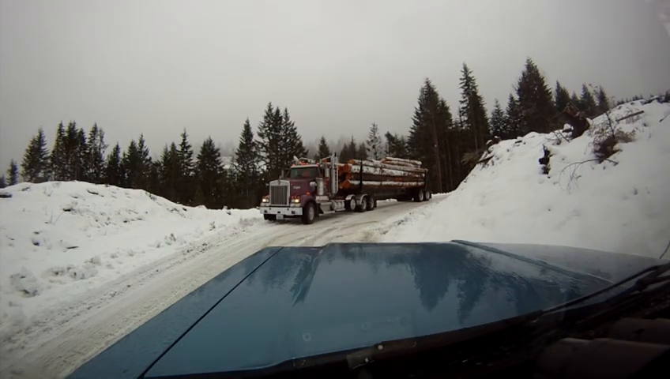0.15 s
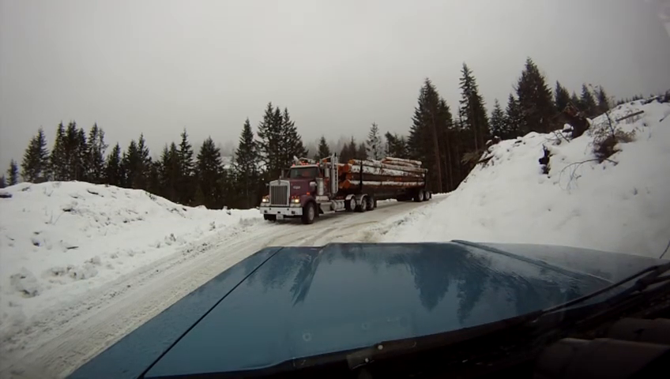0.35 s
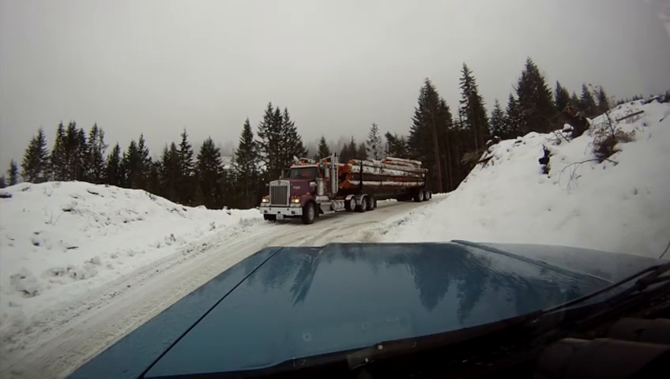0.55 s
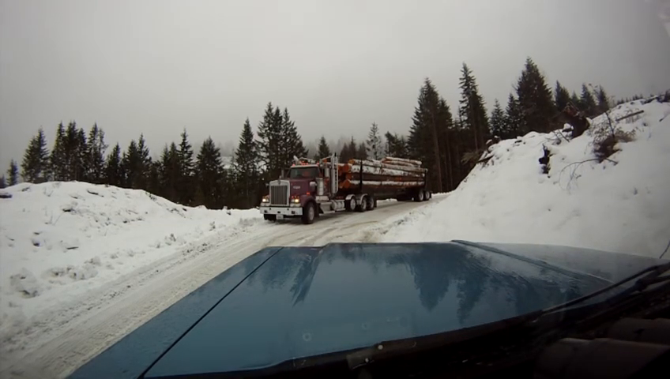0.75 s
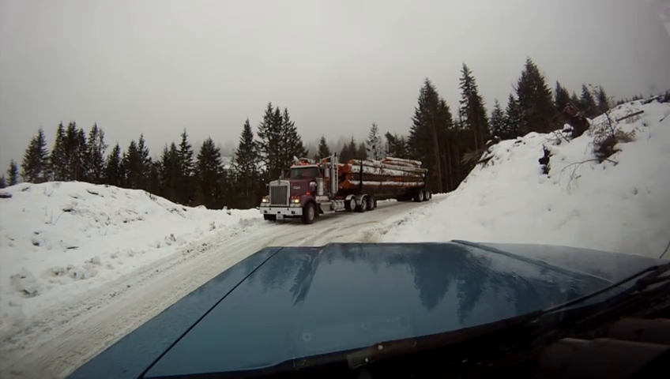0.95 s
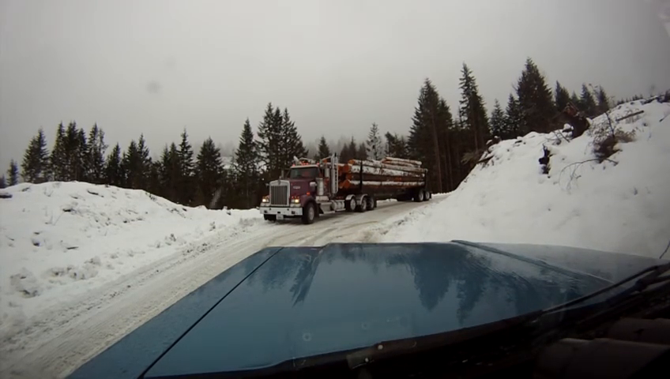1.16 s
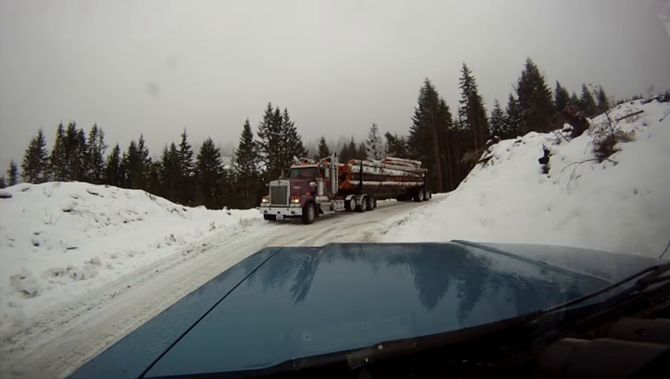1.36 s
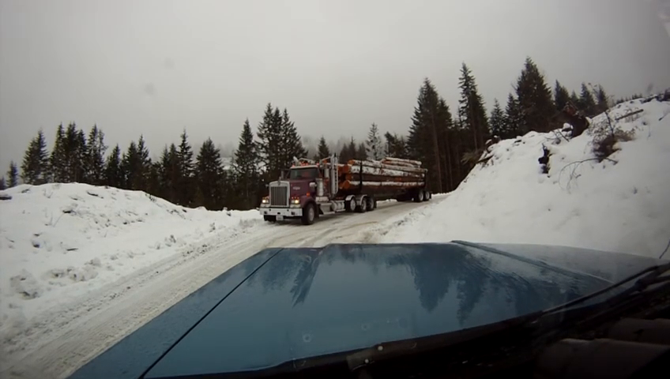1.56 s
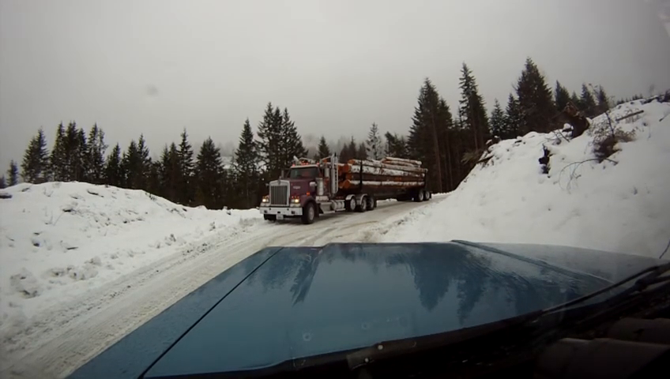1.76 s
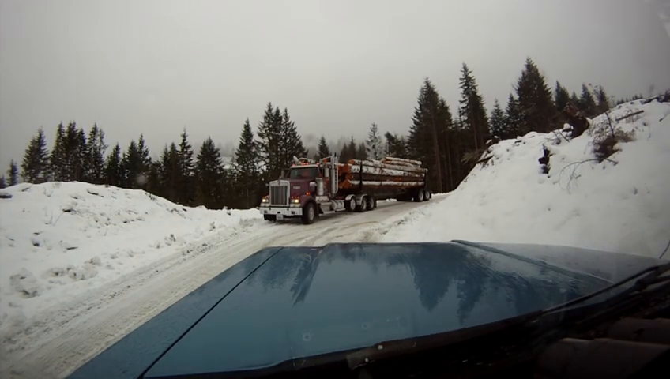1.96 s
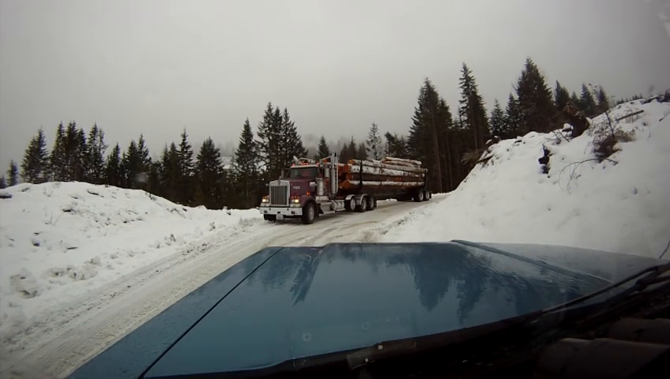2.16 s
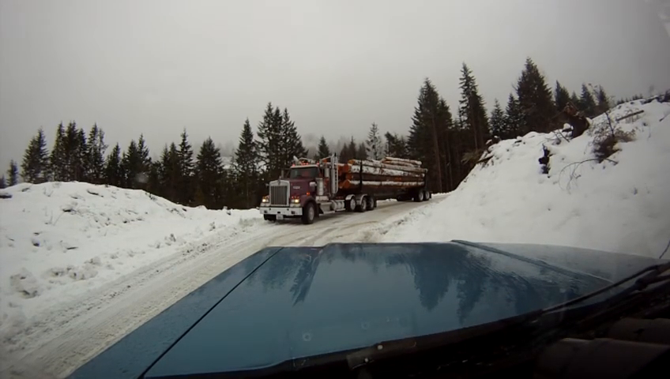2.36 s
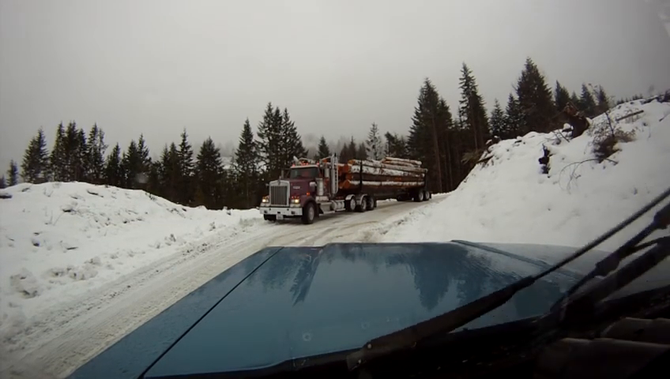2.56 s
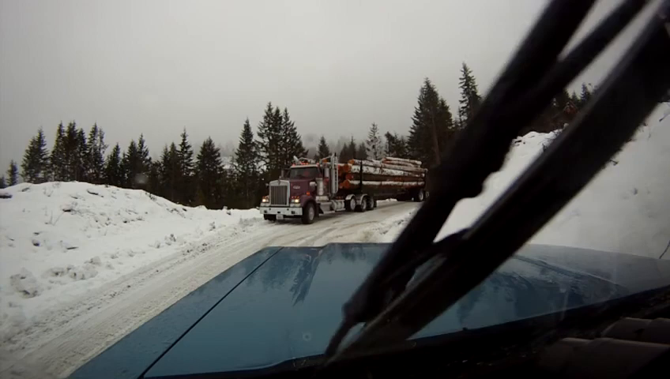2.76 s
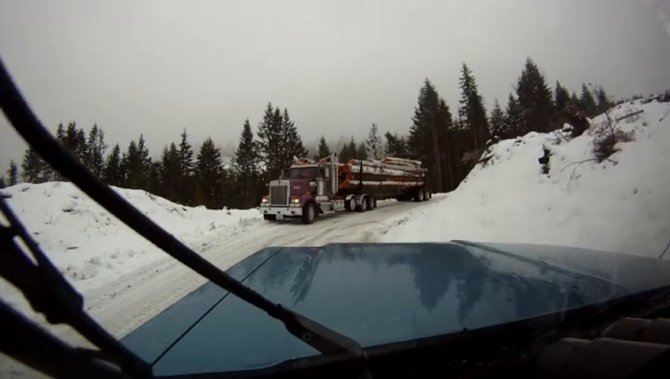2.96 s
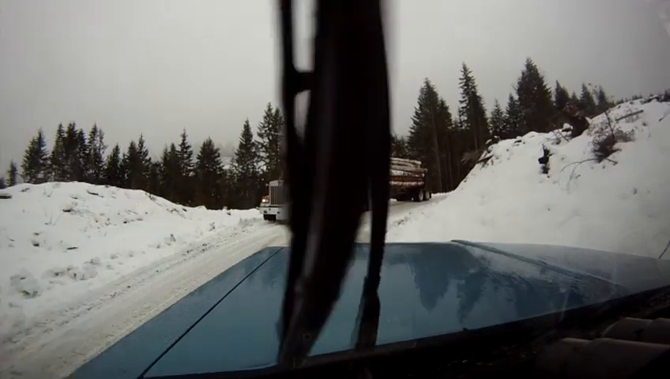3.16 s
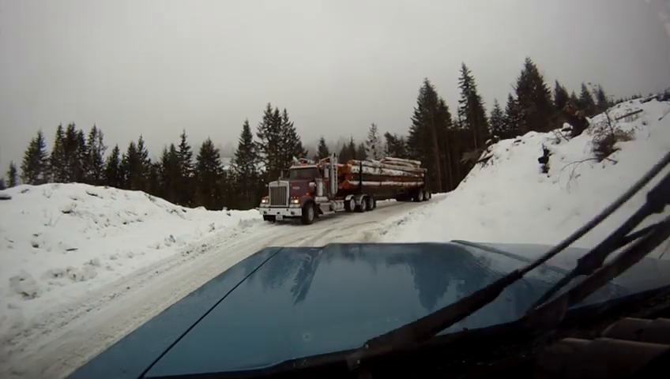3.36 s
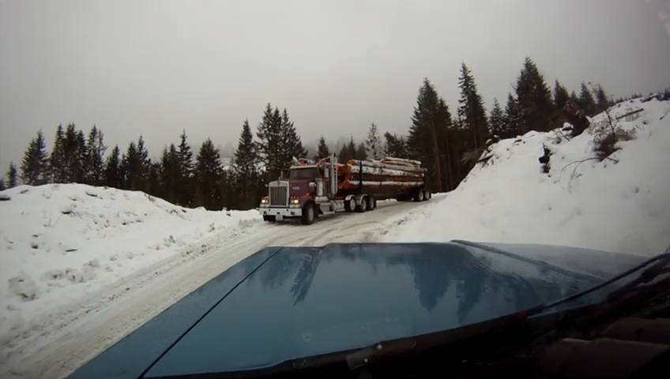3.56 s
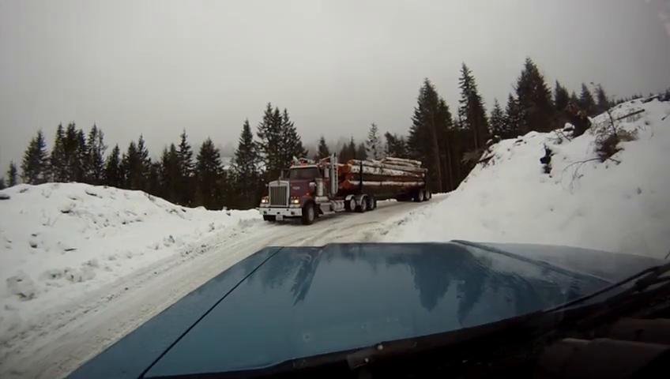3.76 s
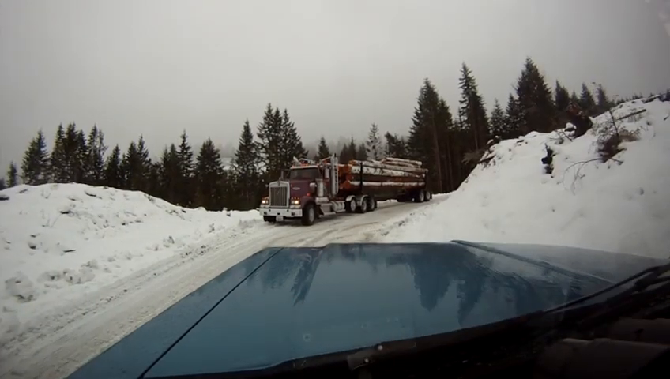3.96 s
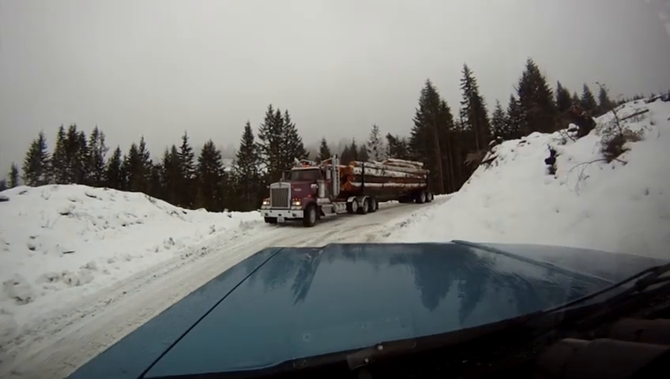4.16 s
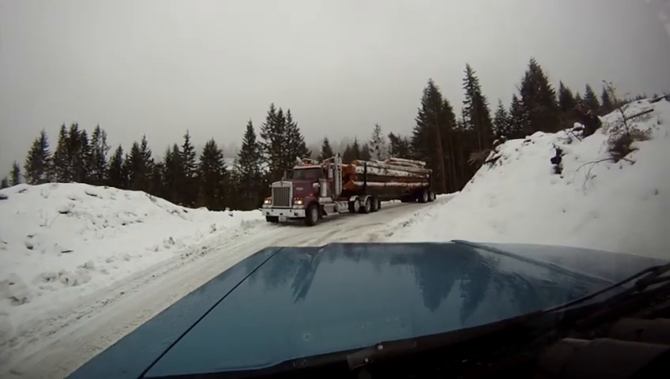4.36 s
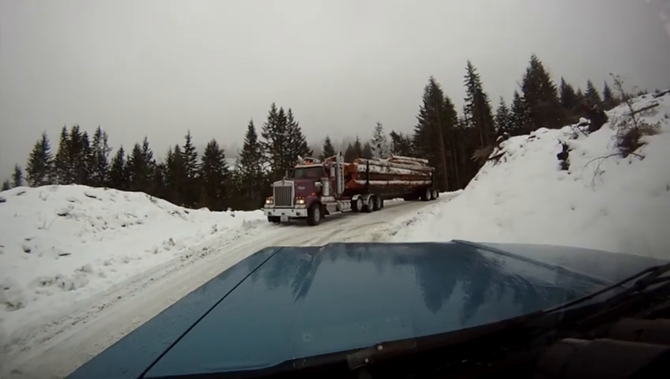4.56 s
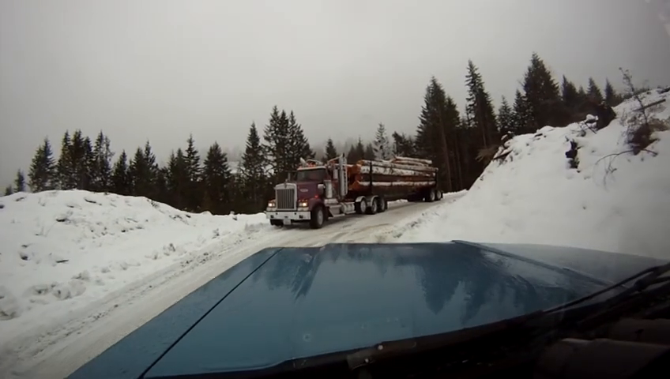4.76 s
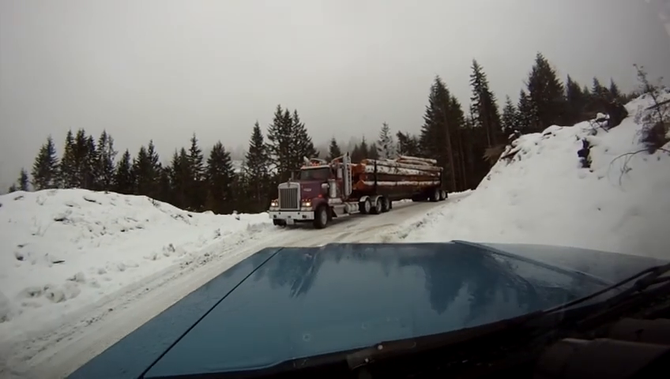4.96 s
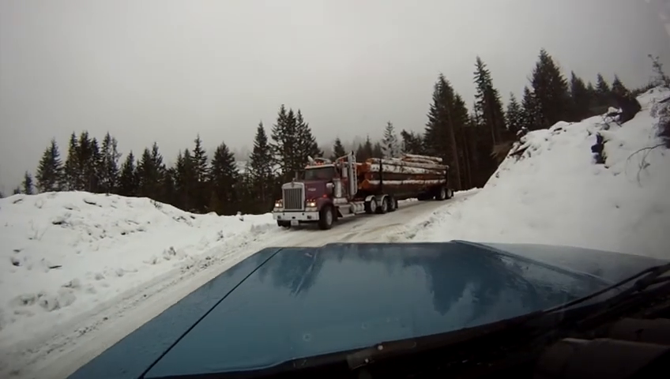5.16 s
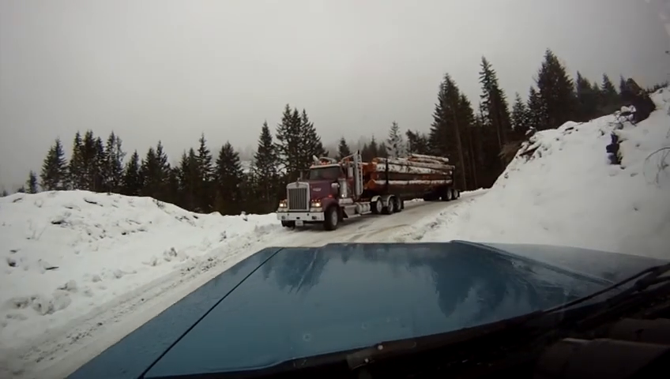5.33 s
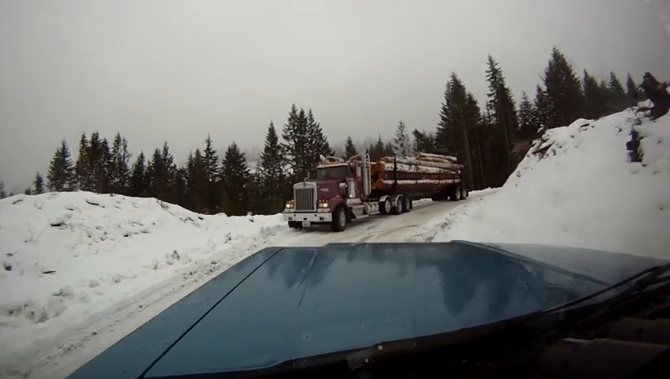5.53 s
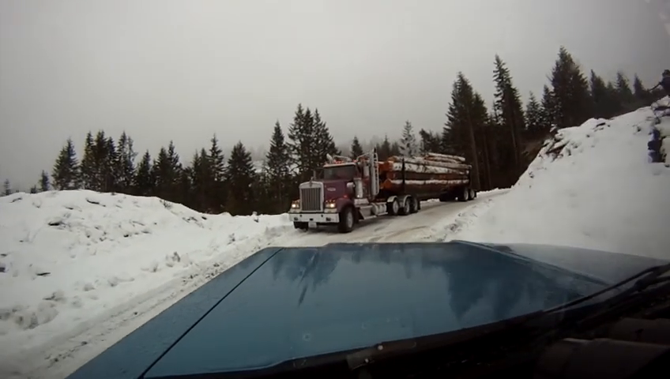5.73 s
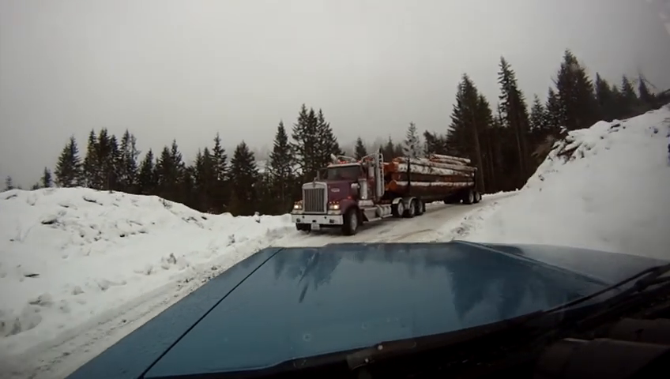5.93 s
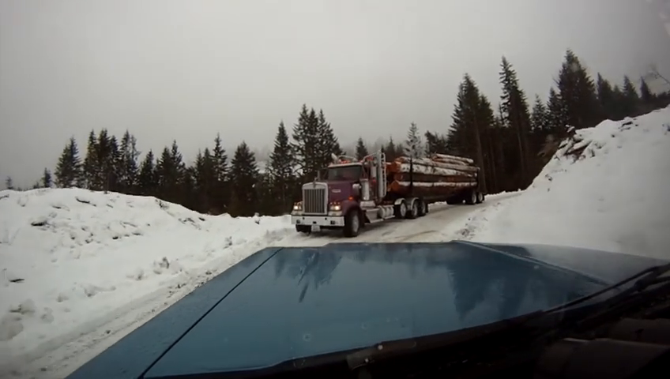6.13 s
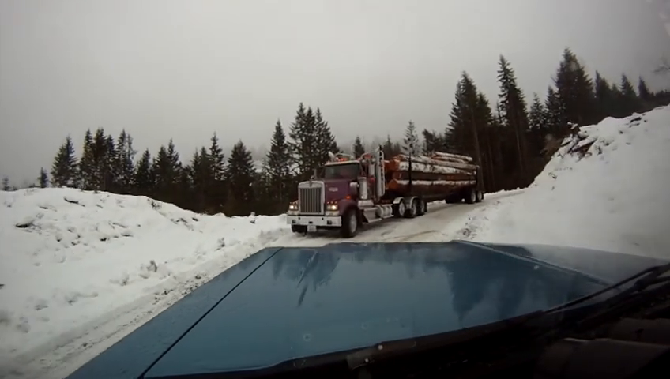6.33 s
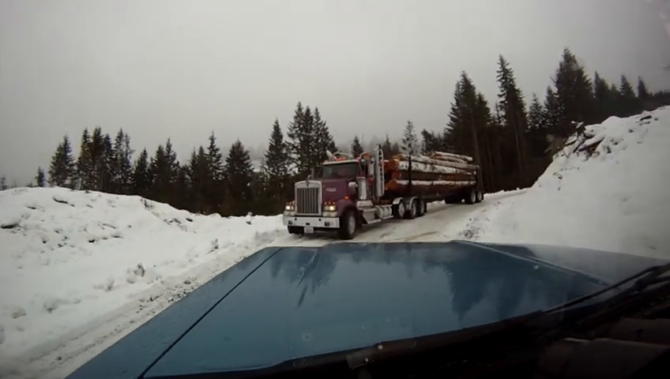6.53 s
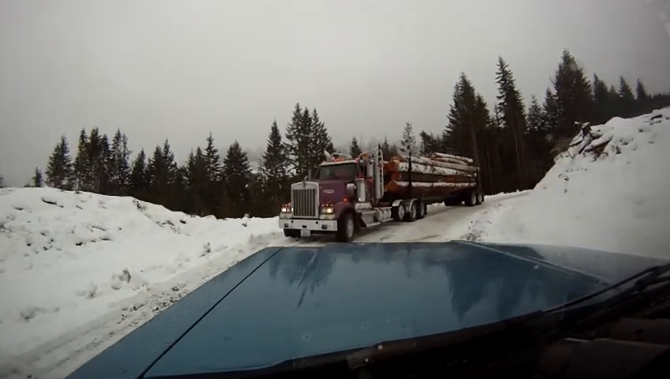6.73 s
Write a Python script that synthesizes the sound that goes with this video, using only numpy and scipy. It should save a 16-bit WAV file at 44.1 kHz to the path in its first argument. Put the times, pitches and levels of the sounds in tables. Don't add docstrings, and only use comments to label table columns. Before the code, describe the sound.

A diesel idle drones and ticks while plastic and metal controls knock, thud and rattle in quick clusters. Short rough squeaks of rubber on glass lead to the loudest double clack at about three seconds. Then the gear engages: the engine grows deeper and knockier, the body sways and rumbles, with few small ticks. Heard in a small cab through a muffled, gritty camera microphone.

```python
import sys
import numpy as np
from scipy import signal
from scipy.fft import rfft, irfft, next_fast_len
from scipy.io import wavfile
from scipy.ndimage import map_coordinates

SR = 44100
rng = np.random.default_rng(int(sys.argv[2]) if len(sys.argv) > 2 else 0)


def level_to_linear(level):
    exponent = np.asarray(level, float) / 20
    return 10 ** exponent


def wav_record(signal):
    frames = np.transpose(np.atleast_2d(signal))
    bounded = np.clip(frames, -1, 1)
    quanta = np.round(bounded * 32767).astype(np.int16)
    wavfile.write(sys.argv[1], SR, quanta)


N = 303849


def unit(x):
    return x / np.sqrt(np.mean(x ** 2) + 1e-20)


def curves(rows):
    s, *cols = np.transpose(rows)
    return [np.interp(np.arange(N) / SR, s, c) for c in cols]


def wobble(rate):
    coarse = np.arange(0, N + 8, 8)
    knots = rng.standard_normal(int(N * rate / SR) + 4)
    return np.interp(np.arange(N), coarse, map_coordinates(knots, [coarse * rate / SR]))


def slope(points):
    hz, db = np.transpose(points)
    return lambda f: level_to_linear(np.interp(np.log(f + 1), np.log(hz + 1), db))


def modes(rows):
    return lambda f: sum(level_to_linear(db) / (1 + ((f - hz) / width) ** 2) ** 1.21 for hz, width, db in rows)


def coloured(x, gain):
    m = 2 * next_fast_len(N // 2 + SR // 4)
    g = gain(np.fft.rfftfreq(m, 1 / SR)) + 1e-6
    fold = irfft(np.log(unit(g)), m)
    fold[1:m // 2] *= 2
    fold[m // 2 + 1:] = 0
    return irfft(rfft(x, m) * np.exp(rfft(fold)), m)[:N]


def noise():
    return rng.standard_normal(N)


def add(track, s, piece):
    part = track[round(s * SR):][:len(piece)]
    part += piece[:len(part)]


def rings(rows, gain_db, attack, wander):
    out, t = np.zeros(N), np.arange(SR // 3) / SR
    for s, db, hz, t60 in rows:
        drift = np.cumsum(rng.standard_normal(len(t))) / np.sqrt(SR / hz)
        turns = hz * t + wander * drift
        fade = level_to_linear(db + gain_db - 60 * t / t60) * (1 - np.exp(-t / attack))
        add(out, s, fade * np.sin(2 * np.pi * turns))
    return out


def swell(s, rise, fall):
    t = np.arange(N) / SR - s
    return np.exp(np.where(t < 0, -(t / max(rise, 2e-3)) ** 2, -t / max(fall, 2e-3)))


ENGAGE_S, ENGAGE_TAKES_S = 3.23, 0.24


def engaged():
    return .5 + .5 * np.tanh((np.arange(N) / SR - ENGAGE_S) / ENGAGE_TAKES_S)


# (frequency [Hz], level [dB per Hz])
PAN = [(29, -32.5), (48, -7), (62, -13), (100, -6.5), (151, -10.5), (231, -2.5), (254, -10), (297, -20),
       (453, -35), (520, -31.5), (680, -71), (1140, -120)]
# (time [s], level [dB])
JOLTS = [
    (.86, -37),
    (1.05, -48),
    (1.57, -28),
    (1.78, -32.5),
    (2.5, -32.5),
    (2.92, -28),
    (3.5, -41),
    (4.8, -45.5),
    (6.1, -47),
]
PAN_DB, PAN_ROLLING_DB = -41, 4


def floor_pan():
    jolted = level_to_linear(PAN_DB + PAN_ROLLING_DB * engaged())
    jolted = jolted + sum(level_to_linear(db) * swell(s, rise=0.06, fall=0.15) for s, db in JOLTS)
    return jolted * level_to_linear(1.52 * wobble(9.1)) * unit(coloured(noise(), slope(PAN)))


# (time [s], level [dB])
BUMPS = [(.85, -36), (1.12, -47), (1.36, -35), (1.58, -32), (1.73, -25), (1.98, -35), (2.22, -35),
         (2.75, -47), (2.98, -33), (3.55, -40), (3.95, -37), (4.3, -33), (4.5, -35), (4.82, -25.5),
         (5.02, -37), (5.33, -38), (5.5, -40), (5.82, -36), (6.03, -35), (6.3, -44), (6.57, -33)]
SWAY_HZ, SWAY_DB, SWAY_ROLLING_DB = 22.1, -44.5, 5.5


def body_sway():
    bumped = level_to_linear(SWAY_DB + SWAY_ROLLING_DB * engaged())
    bumped = bumped + sum(level_to_linear(db) * swell(s, rise=0.083, fall=0.052) for s, db in BUMPS)
    turns = np.cumsum(SWAY_HZ + 2.43 * wobble(9.1)) / SR
    return bumped * level_to_linear(5.0 + 0.89 * wobble(12)) * np.sin(2 * np.pi * turns)


# (time [s], level [dB], start pitch [Hz], end pitch [Hz], length [s])
SQUEAKS = [(1.985, -50, 3600, 3500, 0.04), (1.405, -47, 3250, 3150, .025), (1.93, -48, 3050, 2900, 0.08),
           (1.8, -51, 3600, 3550, .05), (2.776, -33, 1430, 1480, .028), (2.866, -34, 3600, 3600, .065),
           (2.764, -33, 2480, 2540, .012), (2.61, -44.5, 2870, 2830, 0.12), (6.755, -66, 4700, 4550, .06),
           (6.77, -68, 4350, 4300, .04), (2.698, -34.5, 2480, 2210, .03), (2.732, -24, 2300, 2600, 0.034),
           (2.885, -27, 3250, 3150, .03), (2.752, -22, 2400, 1900, 0.022), (2.8, -20, 2050, 2150, 0.028),
           (6.625, -59, 3800, 3700, .045), (6.645, -66, 4750, 4500, 0.03)]
# (time [s], level [dB], pitch [Hz], length [s])
PINGS = [
    (.145, -50, 420, .04),
    (2.76, -46, 5550, .022),
    (2.788, -46, 5550, .026),
    (4.804, -56, 5400, .008),
]
SQUEAK_DB = 4.5


def squeaks():
    out = np.zeros(N)
    flutter_db, waver, slip = 3 * wobble(120), .03 * wobble(400), wobble(350)
    tones = [(*row, .35) for row in SQUEAKS]
    tones += [(s, db, hz, hz, length, .12) for s, db, hz, length in PINGS]
    for s, db, from_hz, to_hz, length, rough in tones:
        u = np.arange(int(length * SR)) / (length * SR)
        at = round(s * SR) + np.arange(len(u))
        glide_hz = from_hz + (to_hz - from_hz) * u
        turns = np.cumsum(glide_hz * (1 + rough * waver[at])) / SR
        level = level_to_linear(db + SQUEAK_DB + rough * flutter_db[at]) * (1 - rough + rough * slip[at])
        add(out, s, level * np.sin(np.pi * u) ** 0.41 * np.sin(2 * np.pi * turns))
    return out


# (time [s], level [dB], length [s], push 1 or pull -1)
SHOVES = [
    (1.237, -18, 0.0078, -1),
    (1.531, -4, 0.0069, 1),
    (1.683, -12.5, 0.021, -1),
    (1.725, -15.5, 0.0132, -1),
]
# (time [s], peak [dB], pitch [Hz], t60 [s])
THUDS = [(0.66, -21, 213, 0.14), (0.686, -15.5, 226, 0.13), (0.826, -17, 226, 0.24),
         (0.929, -21.5, 250, 0.16), (1.01, -21.5, 228.5, 0.21), (1.164, -23, 232, 0.21),
         (1.208, -17.5, 195, 0.1), (1.237, -26, 248, 0.14), (1.531, -11, 228.4, 0.094),
         (1.748, -21.5, 238, 0.23), (1.824, -18.5, 223, 0.43), (1.904, -23, 230, 0.4),
         (2.074, -11.5, 225, 0.1), (2.521, -15, 146, 0.1), (2.532, -10, 202, 0.077),
         (2.571, -22, 196, 0.14), (2.783, -18, 185, 0.16), (2.8, -17, 209, 0.26), (2.861, -1.5, 150, 0.044),
         (2.893, -12.5, 187.6, 0.16), (3.062, -11, 200, 0.07), (3.114, -27, 207, 0.22),
         (5.42, -26, 231, 0.34), (6.048, -18, 142, 0.15), (6.073, -20.5, 229, 0.18)]
# (time [s], peak [dB], pitch [Hz], t60 [s])
DEEP = [
    (1.535, -17, 47, 0.074),
    (1.534, -11, 102, 0.19),
    (1.69, -20, 108.6, 0.23),
    (1.6, -16.5, 150, 0.14),
    (2.076, -14.5, 138, 0.15),
    (2.08, -19, 89, 0.18),
    (2.529, -19, 105, 0.18),
    (2.5, -25, 169, 0.23),
    (6.044, -17.5, 113, 0.16),
    (6, -30, 61.9, 0.11),
]
# (time [s], peak [dB], pitch [Hz], t60 [s])
RINGS = [(0.672, -15, 1118, 0.15), (1.195, -4.5, 1090, 0.025), (1.214, -29, 1050, 0.078),
         (1.529, -9, 1043, 0.083), (1.825, -6.5, 950, 0.04), (1.834, -2, 1150, 0.05),
         (2.069, -13, 1400, .03), (2.524, -10.5, 920, 0.032), (2.531, -8, 1064, 0.071),
         (2.86, 0, 1130, 0.039), (2.8595, -5, 2120, .05), (1.826, -9, 1900, .05), (1.197, -14, 1980, .03),
         (.678, -18, 2140, .06), (2.896, -20, 1180, 0.06), (3.058, -13, 1405, 0.12),
         (3.397, -22, 2070, 0.039), (3.521, -14, 2000, 0.039), (3.625, -10.5, 2000, 0.034),
         (5.605, -14, 2000, 0.043), (6.323, -19, 2000, 0.031), (1.5295, -4, 2350, .03),
         (1.5562, -10, 2000, .03), (1.567, -16, 2050, .035), (1.605, -19, 2120, .09),
         (1.7325, -20, 1060, .05), (1.8245, -6, 1500, .05), (1.9145, -16, 2100, .07),
         (1.943, -21, 2050, .04), (2.085, -15, 1950, .05), (2.918, -14, 1950, .06), (3.068, -3, 2050, .045),
         (4.3, -19, 2000, .035), (.93, -28, 370, .1), (3.069, -8, 1550, .04), (2.893, -14, 1500, .05),
         (1.747, -24, 2100, .06), (1.733, -20, 2050, .05), (2.787, -19, 265, .17), (3.071, -7, 2330, .035),
         (2.8, -24, 780, .1), (1.826, -12, 760, .05), (1.708, -24, 2080, .07), (.915, -22, 1100, .1),
         (1.2, -22, 640, .05), (1.43, -37, 370, .12), (2.862, -16, 310, .08), (2.5, -24, 620, .08)]
RING_TOP_HZ = 2600


def thuds():
    out, t = np.zeros(N), np.arange(SR // 3) / SR
    for s, db, length, way in SHOVES:
        u = t / length
        bend = (1 - np.exp(-t / 0.001)) * np.cos(2.0 * u) * np.exp(-u / 2)
        add(out, s, np.sign(way) * level_to_linear(db) * bend)
    panels = rings(THUDS, 2.5, .002, wander=.04) + rings(DEEP, 0, .004, wander=.06)
    panels = signal.sosfilt(signal.butter(3, 310, fs=SR, output="sos"), panels)
    ringing = rings(RINGS, -2.5, 0.001, wander=0.042)
    ringing = signal.sosfilt(signal.butter(2, RING_TOP_HZ, fs=SR, output="sos"), ringing)
    return out + panels + ringing


# (time [s], peak [dB], low part [dB], bright part [dB], length [s])
CRACKS = [(0.154, -24, -3, -8, 0.007), (1.198, -14, -8, -26, 0.0073), (1.528, -3, -11, -2.5, 0.007),
          (1.536, -12, -8, -6, 0.012), (1.5555, -11, -14, -22, 0.006), (1.567, -20, -12, -26, 0.005),
          (1.583, -25, -4, -15, 0.0048), (1.604, -25, -7, -1, 0.01), (1.732, -17, -6, -14, 0.0053),
          (1.746, -21, -7, -12, 0.006), (1.896, -24, -10, -30, 0.005), (1.914, -16.5, -10, -26, 0.008),
          (1.943, -21, -10, -20, 0.004), (1.963, -20, -12, -22, 0.005), (1.979, -21, -12, -20, 0.006),
          (2.058, -17, -9, -27, 0.006), (2.086, -19, -9, -22, 0.0056), (2.068, -11, 1, -16, 0.0078),
          (2.8585, -1.5, -6, -1.5, 0.0034), (2.994, -19, -16, -10, 0.0055), (3.0685, 1.5, -19, -21, 0.012),
          (3.069, 1.5, -6, 4, 0.0064), (3.112, -14.5, -20, -7, 0.008), (3.123, -19, -22, -12, 0.007),
          (6.044, -26, -10, -25, 0.006), (2.937, -22, -10, -10, .006), (2.1, -24, -8, -14, .008),
          (1.636, -22, -8, -14, .006)]
# (time [s], peak [dB], low part [dB], bright part [dB], length [s])
KNOCKS = [(0.67, -10.5, -9.5, -11, 0.022), (1.211, -17, -3, -15, 0.012), (1.521, -10, -4, -12, 0.011),
          (1.824, -4.5, -5.5, -40, 0.012), (1.832, -6, -6, -21, 0.012), (2.075, -17.5, -2.5, -42, 0.03),
          (2.498, -27, 0.5, -18, 0.018), (2.514, -19, -1, -30, 0.014), (2.528, -20.5, 6.5, -30, 0.025),
          (2.858, -1.5, -11, -10, 0.011), (2.87, -10, -7, -16, 0.0073), (2.888, -14, -6, -6, 0.015),
          (2.919, -17, 1.5, -21, 0.0099), (3.034, -20, -5, -20, 0.02), (3.057, -15, -2, -24, 0.014),
          (3.087, -14, -10, -18, 0.012)]
# (time [s], peak [dB])
TICKS = [(.7522, -56), (0.8275, -54), (.9039, -50), (1.1269, -54), (1.1817, -56), (1.3374, -60),
         (1.408, -57), (2.053, -59), (4.4283, -57), (4.4815, -60), (4.4962, -60), (4.7293, -44.5),
         (4.8055, -52), (4.8504, -53), (5.8227, -55), (5.9135, -54), (5.9703, -61), (6.0392, -55),
         (6.1599, -54)]
# (peak time [s], bright [dB], body over that [dB], rise [s], fall [s])
SCRAPES = [(.78, -57.5, 11, .07, 0.074), (0.915, -44, 5.5, 0.017, 0.039), (.968, -48, 9, 0.03, 0.025),
           (1.03, -55, 9.5, .02, .03), (1.14, -55, 11.5, .02, 0.079), (1.545, -42, 8.5, 0.012, 0.11),
           (1.64, -52, 3, .02, .03), (1.755, -51, 9, 0.01, 0.03), (1.42, -58, 10, .015, .04),
           (1.96, -51.5, 11.5, 0.038, 0.05), (2.085, -51, 3, .01, 0.024), (2.123, -57, 0, .004, .015),
           (2.53, -49.5, 9.5, 0.037, 0.039), (2.77, -44, 7, 0.038, 0.067), (2.82, -47.5, 4, 0.039, 0.013),
           (2.843, -57, 3, .008, .01), (2.897, -30.5, 6.5, 0.021, 0.03), (3.13, -43, 0.5, 0.027, 0.031),
           (3.203, -47, -4, 0.0035, 0.013), (3.222, -53, 2, .004, 0.033), (6.05, -56, 10, 0.015, 0.047),
           (6.5, -58, -4, .02, 0.037), (6.65, -58, 6, .03, .03), (6.79, -59, -5, .03, .04)]
# (frequency [Hz], half width [Hz], level [dB])
CASE = [(610, 45, -11.5), (735.5, 39, -7.5), (864.3, 18.4, 1), (970, 29, -10), (1130, 98, 5),
        (1290, 153, -10.5), (1540, 90, -9), (1893, 124, 0.5), (2106, 70, -0.5), (2430, 110, -8.5),
        (2789, 89, -12.5), (3145, 54, -19.5), (3620, 320, -25), (5090, 570, -37)]
# (frequency [Hz], half width [Hz], level [dB])
STRAIN = [(620, 46, -6), (991, 93, -4), (1260, 15, 0), (1298, 30, -2), (1378, 29, 3.5), (2011, 25, 2.5),
          (2000, 59, 1.5)]
# (frequency [Hz], half width [Hz], level [dB])
DASH = [(560, 900, -11.5)]
# (frequency [Hz], level [dB])
SNAP = [(1800, -29), (2500, 8.5), (3100, 6), (3700, -2), (4400, -9), (5500, -7), (5900, -6), (7000, -63)]
# (frequency [Hz], level [dB])
RUB = [(1800, -24), (2500, 8), (3200, 1.5), (4100, -8.5), (4600, -20), (5300, -10), (5950, -23),
       (7000, -48)]
KNOCK_RISE_S, CRACK_RISE_S = 0.0037, 0.0011


def knocks():
    parts, t = np.zeros((4, N)), np.arange(SR // 8) / SR
    for rows, rise in ((CRACKS, CRACK_RISE_S), (KNOCKS, KNOCK_RISE_S)):
        for s, db, low_db, bright_db, length in rows:
            shape = (1 - np.exp(-t / max(rise, 3e-4))) * np.exp(-(t / length) ** 2.17)
            for part, part_db, steep in zip(parts, (low_db, 0, bright_db), (.9, 1, 1.6)):
                add(part, s, level_to_linear(db + part_db) * shape ** steep)
    for s, db in TICKS:
        add(parts[2], s, level_to_linear(db + 17.5 - 60 * t / 0.028))
    judder = level_to_linear(1.2 * wobble(45))
    for s, bright_db, body_db, rise, fall in SCRAPES:
        near = slice(max(round((s - 4 * rise) * SR), 0), round((s + 8 * fall) * SR))
        blend_db = np.array([[body_db + 9.5], [body_db + 13.0], [-2], [14]])
        parts[:, near] += (judder * swell(s, rise, fall))[near] * level_to_linear(bright_db + blend_db)
    low, high, edge, swish = parts * noise() * level_to_linear(1.64 * wobble(500))
    split = len([hz for hz, *_ in CASE if hz < 1400])
    body = level_to_linear(-4.5) * coloured(low, modes(CASE[:split] + STRAIN[:-2] + DASH))
    body += level_to_linear(-7.5) * coloured(high, modes(CASE[split:-1]))
    return body + level_to_linear(-8.5) * (coloured(edge, slope(SNAP)) + coloured(swish, slope(RUB)))


# (time [s], firings per second [Hz])
SPEED = [(0, 41.15), (2.75, 41.2), (3, 44.5), (3.25, 44), (3.42, 40), (3.6, 38.4), (4.1, 37.7), (4.3, 36.7),
         (4.68, 36.4), (5, 37.5), (5.3, 38.7), (5.62, 41), (5.99, 41.9), (6.16, 43.2), (6.4, 43),
         (6.89, 44)]


def firings():
    speed_hz = curves(SPEED)[0]
    return np.cumsum(speed_hz + 0.082 * wobble(6.1)) / SR


# (time [s], boom [dB])
PULL = [(0, -36.5), (.7, -35.5), (1.4, -33), (2.1, -48), (2.9, -37), (3.18, -26.5), (3.42, -41), (3.6, -27),
        (4.1, -23.5), (4.32, -31), (4.5, -27.5), (5.3, -27), (5.65, -37), (5.99, -33), (6.1, -27),
        (6.4, -34.5), (6.89, -26.5)]
# (multiple of firing [1], level re second order [dB])
WEAK_ORDERS = [(.5, -14), (3, -4.5), (4, -8), (4.5, -18.5), (5, -14), (1.5, -15), (2.5, -13.5), (3.5, -14),
               (5.5, -13.5)]
# (multiple of firing [1], level [dB])
WHINE = [(18, -9), (21, -0.5), (28, -11)]
SECOND_DB, SECOND_FOLLOWS = -40, 0.34
SIXTH_DB, PANEL_HZ, PANEL_WIDTH_HZ = -37.5, 240.8, 14.2
WHINE_DB, WHINE_LOADED_DB = -47.5, -20


def firing_orders(fired):
    boom_db, speed_hz, on = curves(PULL)[0], curves(SPEED)[0], engaged()
    second_db = SECOND_DB + SECOND_FOLLOWS * (boom_db - boom_db.mean())
    sixth_db = SIXTH_DB - 10 * np.log10(1 + ((6 * speed_hz - PANEL_HZ) / PANEL_WIDTH_HZ) ** 4)

    def order(k, db):
        level = level_to_linear(db + 2 + (1.1 + 1.1 * on) * wobble(9))
        return level * np.sin(2 * np.pi * (k * fired + (k - 1) * rng.random()))

    tones = order(1, boom_db) + order(2, second_db) + order(6, sixth_db)
    tones += sum(order(k, second_db + db + 3.3 * on * wobble(2.495)) for k, db in WEAK_ORDERS)
    return tones + sum(order(k, WHINE_DB + WHINE_LOADED_DB * on + db) for k, db in WHINE)


def bursts(turns, life):
    phase = turns % 1
    strength = level_to_linear(0.83 * rng.standard_normal(700)[turns.astype(int)])
    return strength * phase * np.exp(-phase / life)


# (frequency [Hz], half width [Hz], level [dB])
HEAD = [(1150, 70, -3), (1330, 60, -4), (2010, 75, 0), (2850, 70, -9)]
# (frequency [Hz], level [dB per Hz])
HISS = [(100, -27), (400, -2), (2000, 4), (5200, -21), (5900, -19.5), (7000, -59)]
IDLE_LOAD, FULL_LOAD, EASES_PER_S = 0.11, 0.9, 0.076
CLATTER_DB, CLATTER_LOADED_DB, DRIFT_DB = -34, 4, .5
BLOW_DB = -9


def clatter(fired):
    on = engaged()
    eased = EASES_PER_S * (np.arange(N) / SR - ENGAGE_S)
    load = np.clip(IDLE_LOAD + on * (FULL_LOAD - IDLE_LOAD - eased), 0, 1)
    ticking = .9 + unit(bursts(2 * fired + .3, life=0.45))
    idle = coloured(noise() * ticking * (1 + .2 * np.sin(2 * np.pi * fired)), modes(CASE))
    grit, pressure = noise(), unit(bursts(fired + .98, life=.2))
    knock = coloured(grit * (1 + .5 * pressure), modes(CASE + STRAIN))
    blows = pressure * np.sign(grit) * np.diff(np.floor(fired - .12), prepend=-1)
    head = coloured(blows, lambda f: modes(HEAD)(f) ** 2)
    knock = unit(knock) + level_to_linear(BLOW_DB) * unit(head)
    hiss = level_to_linear(-15.5 - 19.0 * load) * coloured(noise(), slope(HISS))
    level = level_to_linear(CLATTER_DB + CLATTER_LOADED_DB * on + DRIFT_DB * wobble(7.8))
    return level * (np.sqrt(1 - load) * unit(idle) + np.sqrt(load) * unit(knock) + hiss)


def engine():
    fired = firings()
    return firing_orders(fired) + clatter(fired)


DUCK_S, DUCK_DB, DUCK_IN_S, DUCK_OUT_S = 3.17, -15, 0.071, 0.039


def scene():
    steady = floor_pan() + body_sway() + engine()
    steady = steady * level_to_linear(DUCK_DB * swell(DUCK_S, DUCK_IN_S, DUCK_OUT_S))
    return (steady + squeaks() + thuds() + knocks())[None]


def band_limit(x):
    return signal.sosfilt(signal.butter(12, 15200, fs=SR, output="sos"), x)


def record(dry):
    slow = np.clip(signal.resample_poly(dry, 40, 147, axis=1), -1, 1)
    held = signal.resample_poly(np.repeat(slow, 4, axis=1), 147, 160, axis=1)[:, :N]
    held = signal.sosfilt(signal.ellip(8, .3, 50, 15550, fs=SR, output="sos"), held)
    return band_limit(np.clip(held, -1, 1))


dry = scene()
out = record(dry)
wav_record(out)
```